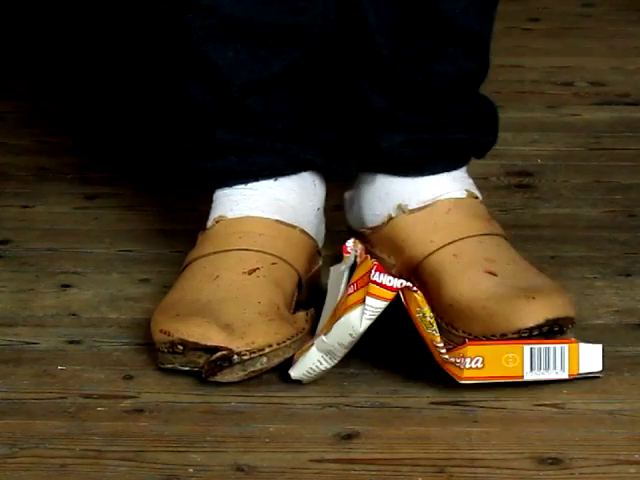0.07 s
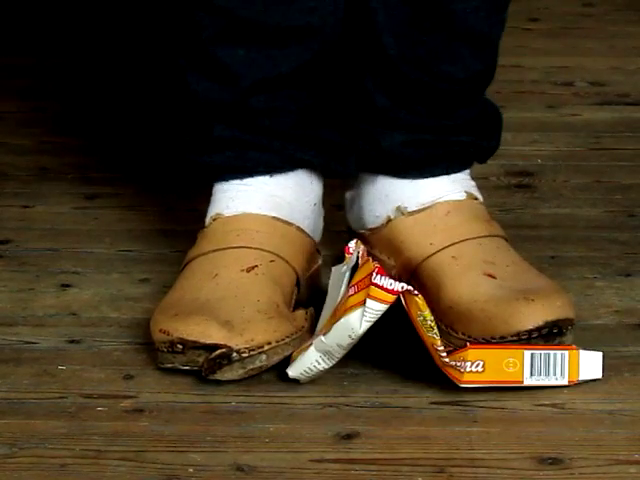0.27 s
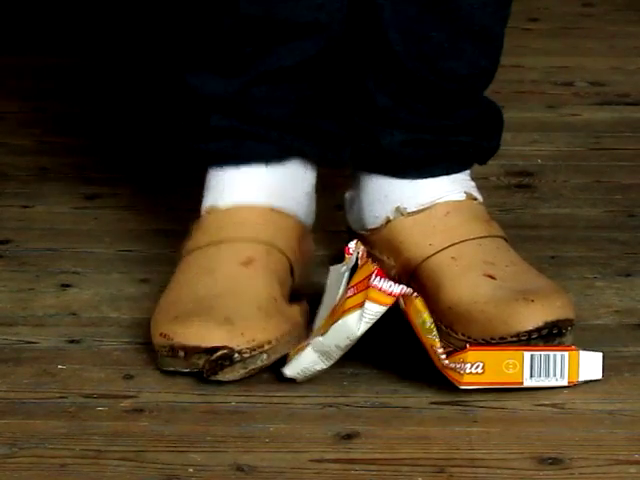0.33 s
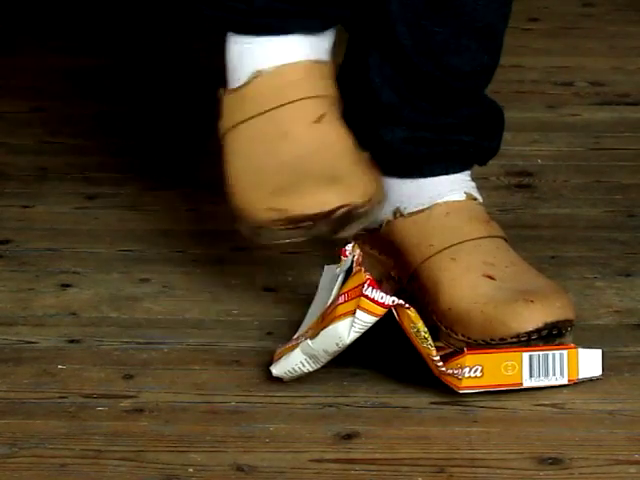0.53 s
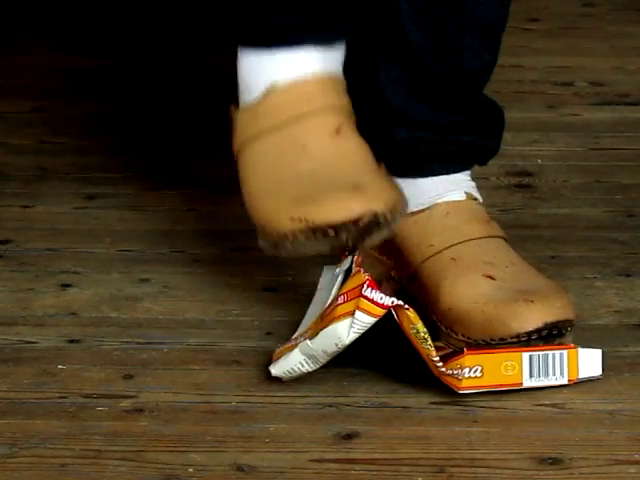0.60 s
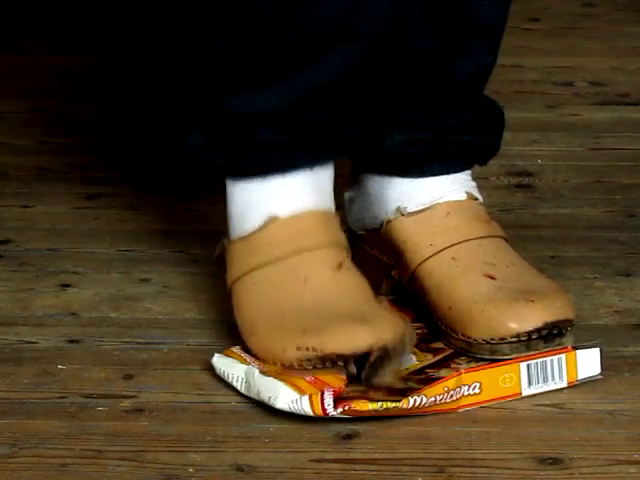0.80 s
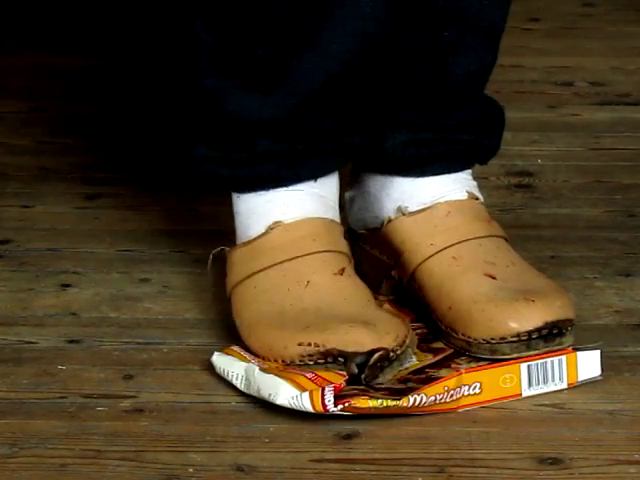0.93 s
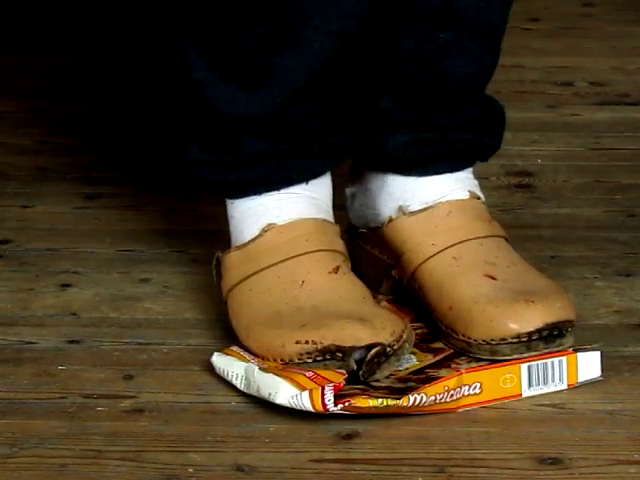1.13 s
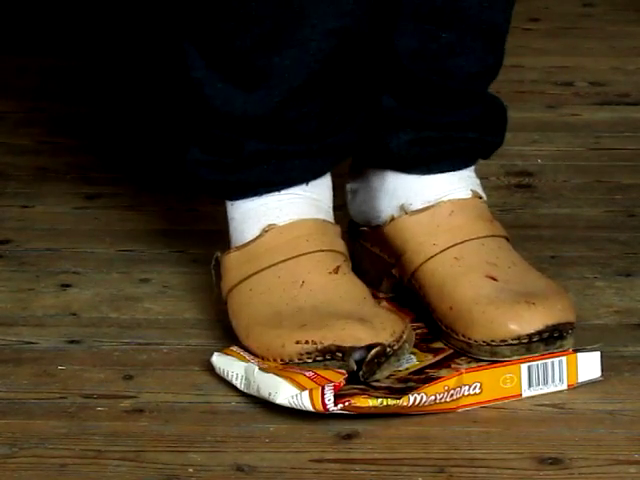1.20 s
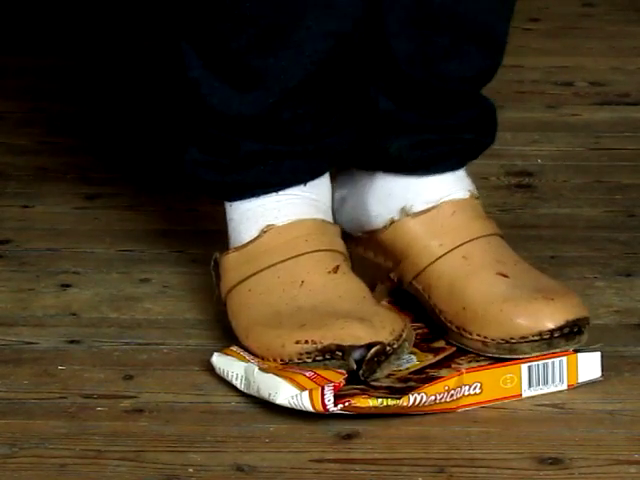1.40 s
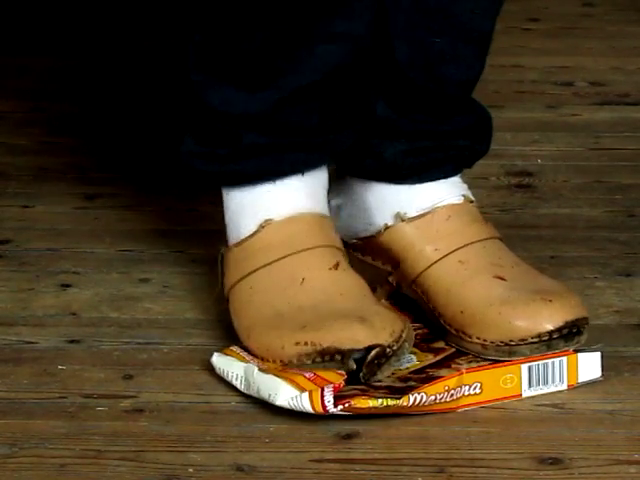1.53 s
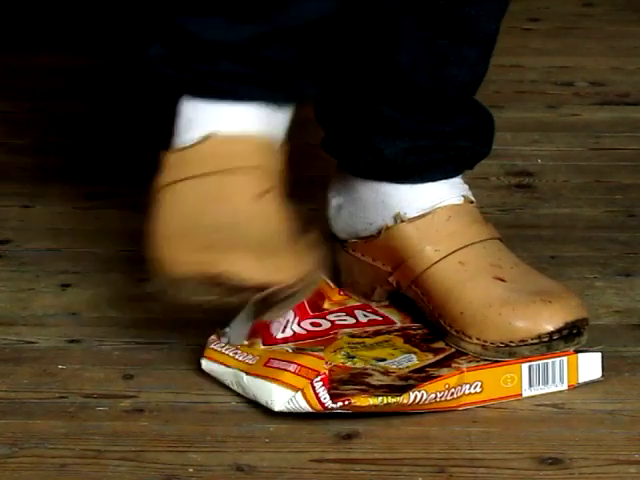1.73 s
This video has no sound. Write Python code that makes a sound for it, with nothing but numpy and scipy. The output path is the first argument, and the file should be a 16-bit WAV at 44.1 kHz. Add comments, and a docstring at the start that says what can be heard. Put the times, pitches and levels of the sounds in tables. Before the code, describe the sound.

Two wooden clog knocks on floorboards, with a cardboard box crunching flat underfoot in between.

```python
"""Wooden clogs on boards and cardboard

Close by in a small room, a clog knocks on the plank floor, and sole and boards ring in their modes.
It lifts off a cardboard box, which springs back with a snap, then treads the hollow box flat.
Under the shifting weight the planks flex and the cardboard crunches and creaks as its folds and
fibres give way in tiny impulses. Then a clog knocks down again."""
import sys
import numpy as np
from scipy import signal
from scipy.fft import rfft, irfft, next_fast_len
from scipy.io import wavfile

SR = 44100
rng = np.random.default_rng(int(sys.argv[2]) if len(sys.argv) > 2 else 0)


def unload_wav(signal):
    """Save mono or channel-first audio to the path in sys.argv[1] as 16-bit WAV at rate SR, clipped to [-1, 1]."""
    wavfile.write(
        sys.argv[1],
        SR,
        np.round(np.clip(np.atleast_2d(signal).T, -1, 1) * 32767).astype(np.int16),
    )


N = 77175

# stereo width, as side relative to mid: frequency_hz, level_db
SIDE_SPECTRUM = [(50, -20), (125, -8), (300, -12), (700, -17.5), (1200, -15), (2500, -15), (4500, -13.5),
                 (8000, -5), (14000, -7)]


def amp(db):
    """Amplitude ratio: a factor of ten for every 20 dB."""
    return 10 ** (np.asarray(db) / 20)


def unit_rms(x):
    """Normalisation to a mean power of one."""
    return x / np.sqrt(np.mean(x ** 2) + 1e-20)


def along(points, hz):
    """Interpolation of (frequency, value) points on a logarithmic frequency axis."""
    frequencies, values = np.transpose(points)
    return np.interp(np.log(hz + 1), np.log(frequencies + 1), values)


def filtered(x, response):
    """Linear filtering: the spectrum is multiplied by a frequency response."""
    n = x.shape[-1]
    padded = next_fast_len(n + 8192)
    return irfft(rfft(x, padded) * response(np.fft.rfftfreq(padded, 1 / SR)), padded)[..., :n]


def shaped(x, spectrum):
    """Spectral shaping by a curve of (frequency_hz, level_db) points."""
    return filtered(x, lambda hz: amp(along(spectrum, hz)))


def soft_contact(hz, edge_hz):
    """A contact of finite duration excites little above its edge frequency."""
    return 1 / np.sqrt(1 + (hz / edge_hz) ** 4)


def stereo(pair):
    """Mid-side stereo: sum and difference of two unrelated signals give left and right."""
    side = shaped(pair[1], SIDE_SPECTRUM)
    return np.array([pair[0] + side, pair[0] - side])


def add(track, start_s, sound):
    """Superposition: a sound adds to the track from its start time."""
    i = max(round(start_s * SR), 0)
    track[:, i:i + sound.shape[-1]] += sound[..., :N - i]


def modes(rows, attack_s):
    """Free vibration: a sum of damped sines, each with a phase offset between left and right."""
    t = np.arange(SR // 2) / SR
    out = np.zeros((2, len(t)))
    for k, (hz, db, t60) in enumerate(rows):
        phase = (-1) ** k * 0.36 * amp(along(SIDE_SPECTRUM, hz)) * np.array([[1], [-1]])
        out += amp(db - 60 * t / t60) * np.sin(2 * np.pi * hz * t + phase)
    return out * (1 - np.exp(-t / attack_s))


def diffuse_tail(response, attack_s):
    """A diffuse field: coloured noise decays in each band at the room's reverberation time."""
    # reverberation times: frequency_hz, t60_s
    room_decay = [(100, 0.34), (300, 0.33), (1000, 0.23), (3000, .25), (7000, 0.19), (14000, 0.28)]
    noise = unit_rms(filtered(rng.standard_normal((2, SR // 2)), response))
    hz, t, bands = signal.stft(stereo(noise), SR, nperseg=256)
    decay = amp(-60 * t / along(room_decay, hz)[:, None])
    ring = signal.istft(bands * decay, SR)[1]
    return ring * (1 - np.exp(-np.arange(ring.shape[1]) / SR / attack_s))


def reverberated(direct):
    """The small room's short, diffuse reverberation, drawn afresh every 80 ms so no pitch stands out."""
    wet, mid, piece = np.zeros((2, N)), direct.mean(axis=0), round(0.08 * SR)
    for i in range(0, N, piece):
        response = diffuse_tail(np.ones_like, attack_s=0.0005)
        response /= np.linalg.norm(response[0])
        add(wet, i / SR, signal.fftconvolve(mid[None, i:i + piece], response, axes=1))
    return (direct + wet) / np.sqrt(2)


def room_tone():
    """Faint steady noise; a part in antiphase between left and right makes the bass very wide."""
    # spectra of the in-phase and antiphase noise: frequency_hz, level_db
    centre_spectrum = [(20, -28.5), (60, -4), (110, 3.5), (430, 2), (900, -4.5), (1500, -7), (2800, -7),
                       (4100, -19), (5600, -13), (8000, -21), (16000, -39.5)]
    wide_spectrum = [(25, -22), (130, -4.5), (240, -3), (575, -10.5), (900, -16.5), (1500, -23),
                     (2300, -26.5), (3900, -36), (6500, -36), (12000, -50), (16000, -71)]
    mid = amp(-63.5) * unit_rms(shaped(rng.standard_normal(N), centre_spectrum))
    side = amp(-54) * unit_rms(shaped(rng.standard_normal(N), wide_spectrum))
    return np.array([mid + side, mid - side])


def grains(spectrum, per_s, spread_db):
    """Shot noise: fibres give way in tiny clicks of random time and size."""
    size = amp(spread_db * np.clip(rng.standard_normal((2, N)), -2, 2))
    polarity = rng.choice([-1, 1], (2, N))
    clicks = size * polarity * (rng.random((2, N)) < per_s / SR)
    return unit_rms(stereo(shaped(clicks, spectrum)))


def cardboard_crushing():
    """Acoustic emission: folds crunch and surface fibres crackle under the load of a clog."""
    # level contours, one list for each press on the box: time_s, crunch_db, crackle_db
    presses = [
        [(0, -41.5, -43), (.015, -38.5, -47), (.034, -42.5, -53.5), (.051, -45, -44.5)],
        [(.25, -64, -73), (.3, -61.5, -72), (.36, -62, -68.5), (.402, -54.5, -60), (.436, -57.5, -66)],
        [(.704, -41, -51.5), (.732, -39.5, -47), (.8, -43, -52), (.848, -46.5, -58), (.872, -45.5, -47),
         (.91, -48, -64.5), (.956, -59, -66), (1.02, -61, -67.5), (1.085, -55, -64), (1.12, -60.5, -61),
         (1.16, -62, -66), (1.316, -58.5, -64), (1.352, -51, -59.5), (1.388, -44.5, -51), (1.41, -55, -66),
         (1.425, -46, -53), (1.455, -61, -52), (1.49, -65, -69.5), (1.54, -56.5, -67.5), (1.59, -57.5, -64),
         (1.622, -41, -50.5), (1.652, -60, -64), (1.675, -44, -56), (1.75, -61.5, -62.5)],
    ]
    # spectra of the yielding folds and fibres: frequency_hz, level_db
    crunch_spectrum = [(50, -53), (110, -7), (450, -4.5), (880, -2.5), (1150, -7), (1650, -5), (2600, -9),
                       (3200, -12), (4200, -30), (9000, -68)]
    crackle_spectrum = [(2500, -17), (4200, -4), (5500, -0.5), (7000, -3), (9000, -9.5), (12000, -21.5),
                        (16000, -36)]
    t, crunch, crackle = np.arange(N) / SR, np.zeros(N), np.zeros(N)
    fade_s = 0.0014
    for press in presses:
        time_s, crunch_db, crackle_db = np.transpose(press)
        outside_s = abs(t - np.clip(t, time_s[0], time_s[-1]))
        pressed = np.exp(-outside_s / fade_s)
        crunch += pressed * amp(np.interp(t, time_s, crunch_db) + 0.5)
        crackle += pressed * amp(np.interp(t, time_s, crackle_db) - 1.5)
    folds = crunch * grains(crunch_spectrum, per_s=900, spread_db=2)
    fibres = crackle * grains(crackle_spectrum, per_s=3000, spread_db=3.5)
    return reverberated(folds + fibres)


def contact_crack():
    """Impact transient: hard contact radiates one sharp pulse."""
    # spectrum of wood striking wood: frequency_hz, level_db
    crack_spectrum = [(30, 20), (80, -8), (200, -19), (1500, -6.5), (2400, 9.5), (3500, -3.5),
                      (4600, -13.5), (6500, -2), (7600, -11), (9000, -12), (12000, -35), (16000, -30)]
    pulse = shaped(signal.unit_impulse(SR // 50, 16), crack_spectrum)
    return pulse / abs(pulse).max()


def clog_knocks():
    """Impact excitation: a crack, the short clack of the sole, then the ring of boards and room."""
    # blows on the floor: start_s, modes_db, edge_hz, crack_db, low_cut_hz, ring_db, decay_factor
    blows = [(0.0525, 0, 2100, -10.5, 160, -20.5, 0.8), (1.4401, -2.5, 1330, -24.5, 172, -20.5, 1.01)]
    # modes of the wooden sole and of the floor with its room: frequency_hz, level_db, base_t60_s
    sole_modes = [(363.5, -10, 0.058), (390, -19.5, 0.15), (746, -4.5, 0.027), (1083, -17.5, 0.035)]
    floor_modes = [(259.6, -20.4, 0.31), (286.3, -15, 0.22), (318.7, -19, 0.22), (343.4, -23.5, 0.29),
                   (364, -27, 0.25), (424, -11, 0.11), (503.3, -29.5, 0.32), (539, -32, 0.13),
                   (603.2, -6, 0.059), (672.5, -19, 0.098), (686, -36, 0.097), (761.5, -43.5, 0.47),
                   (814, -27, 0.1), (889, -27, 0.23)]
    # spectrum of the diffuse ring: frequency_hz, level_db
    ring_spectrum = [(40, -56), (90, -12), (130, -17), (200, -11.5), (280, 7), (520, -2), (650, 1),
                     (950, -1), (1250, -2.5), (1800, -12), (2400, -16), (3800, -25.5), (6000, -17),
                     (14000, -31)]
    out = np.zeros((2, N))
    for start_s, modes_db, edge_hz, crack_db, low_cut_hz, ring_db, decay_factor in blows:
        struck = lambda rows: [(hz, db + 20 * np.log10(soft_contact(hz, edge_hz)), decay_factor * t60)
                               for hz, db, t60 in rows]
        wood = modes(struck(floor_modes), attack_s=0.0056) + modes(struck(sole_modes), attack_s=0.00044)
        low_cut = signal.butter(2, low_cut_hz, "high", fs=SR, output="sos")
        colour = lambda hz: amp(along(ring_spectrum, hz)) * soft_contact(hz, edge_hz)
        add(out, start_s, amp(crack_db) * contact_crack())
        add(out, start_s, amp(modes_db) * signal.sosfilt(low_cut, wood))
        add(out, start_s, amp(ring_db) * diffuse_tail(colour, attack_s=0.0036))
    return out


def plank_thuds():
    """Flexural vibration: the planks bend and ring as they take the weight."""
    # weight settling on the planks: start_s, level_db, pitch_hz
    thuds = [(0.37, -49, 124), (.398, -49.5, 341.5), (0.438, -52, 138.1), (0.704, -47, 132.5),
             (.873, -40, 120.9), (1.063, -48, 132.3), (1.483, -28.5, 131), (1.666, -46, 365.2)]
    # bending modes: pitch_ratio, level_db, t60_s
    plank_modes = [(.86, -21.5, 0.55), (1, 0, 0.17), (1.28, -2, 0.19), (2.2, -7, 0.21), (3.05, -4, 0.17)]
    out = np.zeros((2, N))
    for start_s, level_db, pitch_hz in thuds:
        tuned = [(ratio * pitch_hz, db, t60) for ratio, db, t60 in plank_modes]
        add(out, start_s, amp(level_db) * modes(tuned, attack_s=0.0052))
    return out


def snap_click(band_hz, decay_s):
    """A sudden release radiates a brief burst of band-limited noise."""
    t = np.arange(SR // 50) / SR
    burst = stereo(rng.standard_normal((2, len(t)))) * np.exp(-t / decay_s)
    burst = signal.sosfilt(signal.butter(3, band_hz, "band", fs=SR, output="sos"), burst)
    return burst / abs(burst).max()


def box_snaps():
    """Snap-through buckling: a panel springs back or caves in with a click that rings in the room."""
    # panels snapping over: start_s, level_db, edge_hz
    snaps = [(0.4383, -34, 2780), (0.703, -39.5, 3260), (0.8656, -48, 9100), (0.8735, -72, 14000),
             (1.323, -47.5, 3400), (1.447, -46, 9100), (1.595, -48, 3430)]
    # spectrum of the ring after a snap: frequency_hz, level_db
    snap_spectrum = [(60, -27), (200, -9.5), (420, -4), (900, -4), (1500, -5), (2600, -6), (4000, -15),
                     (6000, -21), (14000, -36)]
    out = np.zeros((2, N))
    for start_s, level_db, edge_hz in snaps:
        colour = lambda hz: amp(along(snap_spectrum, hz)) * soft_contact(hz, edge_hz)
        add(out, start_s, amp(level_db - 1) * snap_click((edge_hz / 3, edge_hz), decay_s=0.0018))
        add(out, start_s, amp(level_db) * diffuse_tail(colour, attack_s=0.00019))
    return out


def box_taps():
    """Resonance of a hollow body: the box rings under the sole, higher once it is flat."""
    # the sole hitting the box: start_s, level_db, pitch_factor
    taps = [(.697, -39.5, 0.96), (0.7041, -28, 1), (0.716, -37, 1), (.796, -35.5, 0.82), (.829, -36.5, 1.1),
            (.851, -45, 1.38), (0.862, -36, 1.4)]
    # modes of the box: base_frequency_hz, level_db, t60_s
    box_modes = [(524, -6.5, 0.055), (798, -5.5, 0.11), (885, -4.5, 0.15), (1000, -3, 0.049),
                 (1140, -9, 0.18), (1733, -11.5, 0.067)]
    out = np.zeros((2, N))
    for start_s, level_db, pitch_factor in taps:
        tuned = [(pitch_factor * hz, db, t60) for hz, db, t60 in box_modes]
        add(out, start_s, amp(level_db) * modes(tuned, attack_s=0.0012))
    return out


def scene():
    """The sources superpose; nearly equal levels left and right place them almost straight ahead."""
    mix = room_tone() + cardboard_crushing() + clog_knocks() + plank_thuds() + box_snaps() + box_taps()
    return mix * amp([[-0.2], [0.2]])


def record(dry):
    """Band limiting: an ideal low-pass filter removes the highest treble."""
    return filtered(dry, lambda hz: hz < 16200)


dry = scene()
out = record(dry)
unload_wav(out)
```